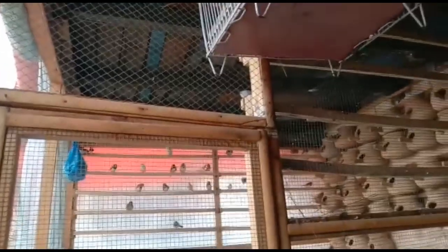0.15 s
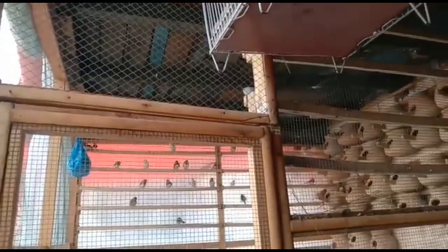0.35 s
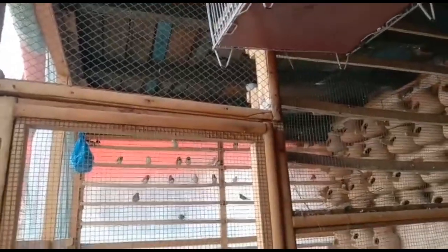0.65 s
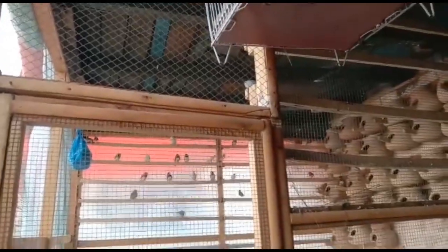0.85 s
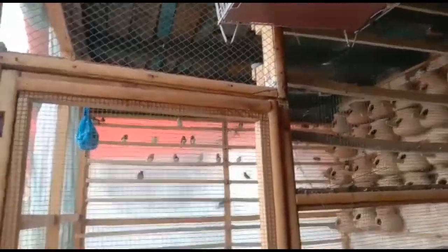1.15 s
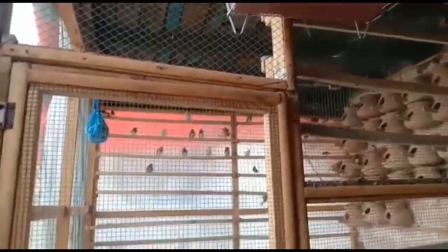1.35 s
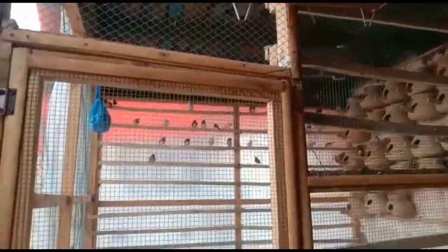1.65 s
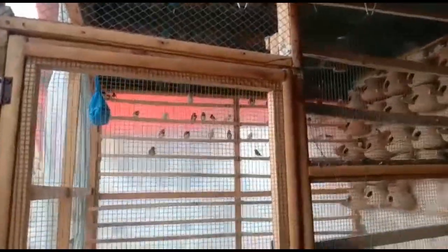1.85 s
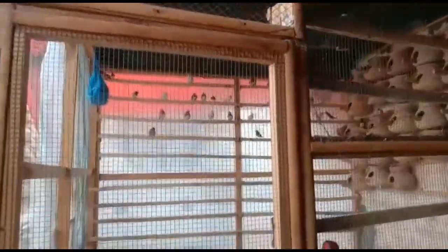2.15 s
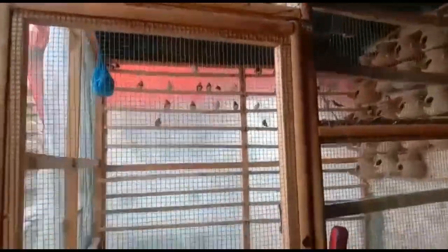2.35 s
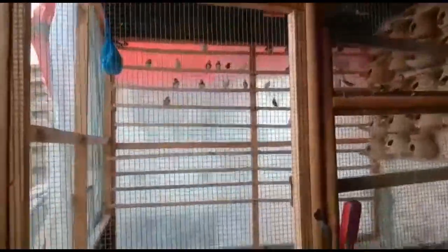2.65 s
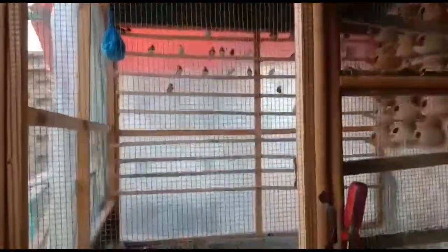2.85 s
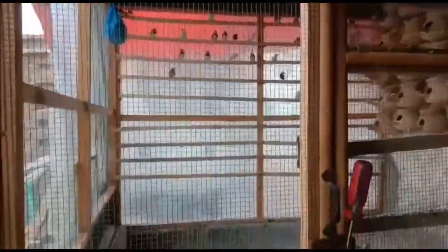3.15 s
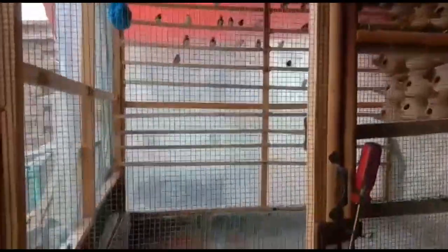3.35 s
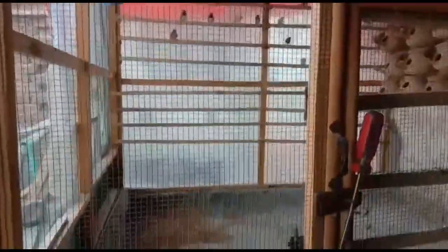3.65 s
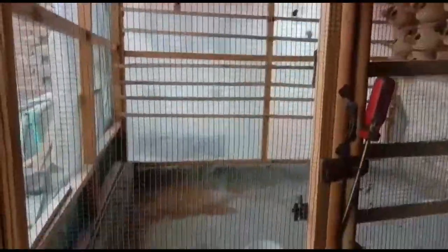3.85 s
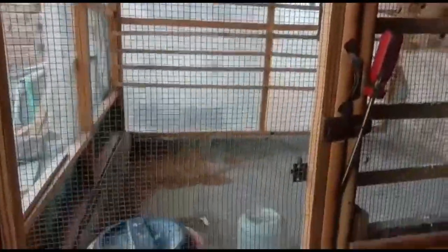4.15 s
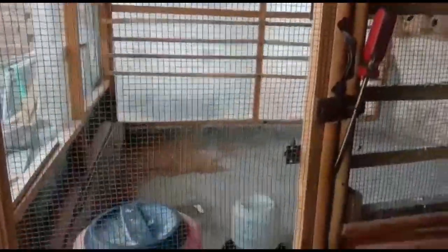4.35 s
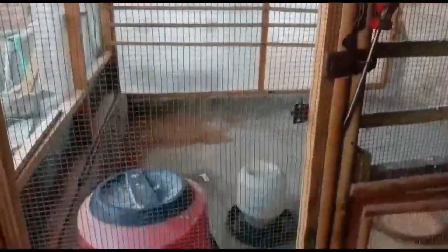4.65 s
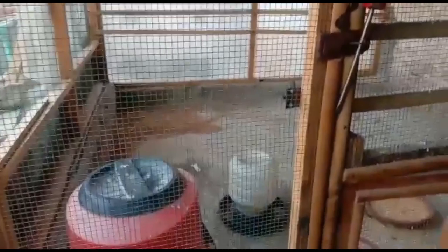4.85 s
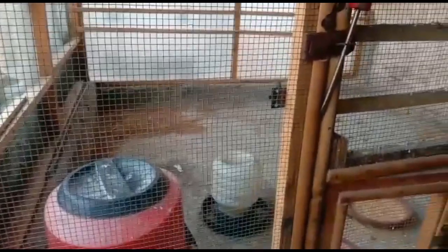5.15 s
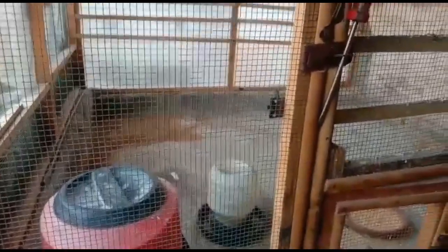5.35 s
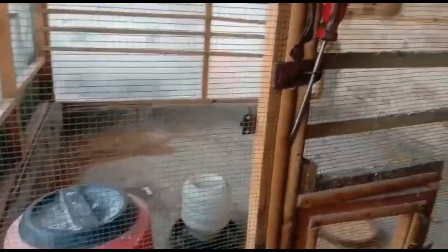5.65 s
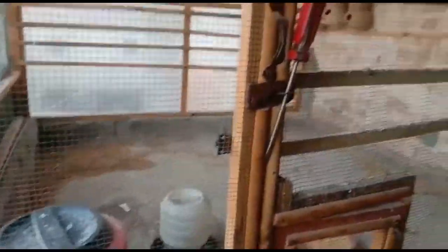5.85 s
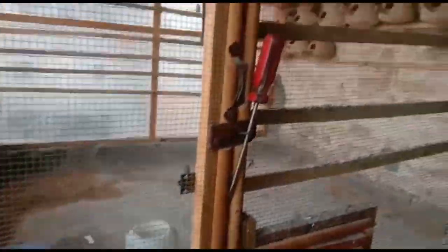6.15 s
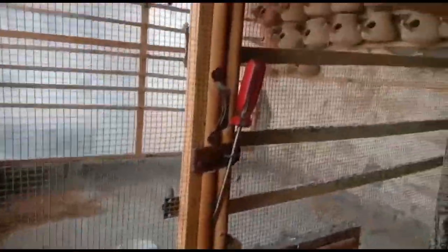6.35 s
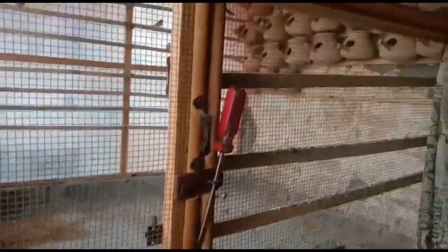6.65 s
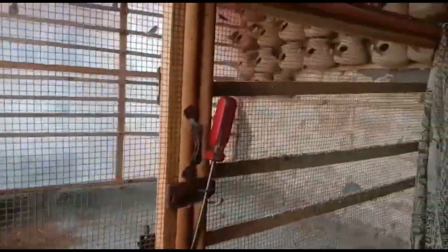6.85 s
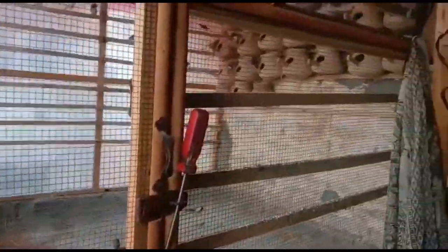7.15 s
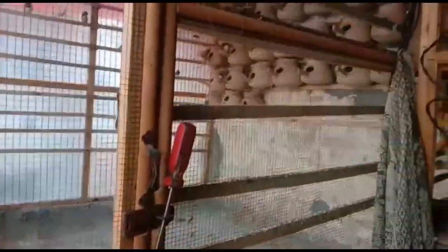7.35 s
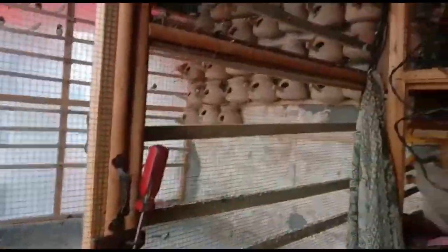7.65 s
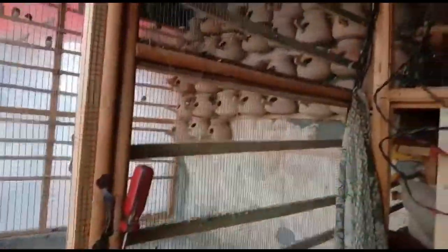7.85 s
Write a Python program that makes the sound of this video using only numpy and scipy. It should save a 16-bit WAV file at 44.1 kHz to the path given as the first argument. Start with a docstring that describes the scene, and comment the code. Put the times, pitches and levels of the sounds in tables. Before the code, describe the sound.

A flock of finches chatters in overlapping nasal calls and chirps, with light flicks on wire mesh and a low rumble beneath.

```python
"""A wood and wire aviary of small finches. Soft nasal calls and harsh rasps come from the back, loud
arched chirps from nearer perches in the second half. Each voice is a harmonic stack plus pulsed breath,
shaped by throat and beak and echoed by the walls. Claws pluck the wire; wings and feet flick mesh and
wood; one bird flies briefly. Beneath lie a low rumble, a faint hiss and a few dull bumps. Almost mono."""
import sys
import numpy as np
from scipy import signal
from scipy.fft import rfft, irfft, next_fast_len
from scipy.io import wavfile
from scipy.ndimage import map_coordinates

SR = 44100
rng = np.random.default_rng(int(sys.argv[2]) if len(sys.argv) > 2 else 0)


def dump(signal):
    """Clip the signal to [-1, 1] and save it as 16-bit WAV at the path in sys.argv[1]."""
    limited = np.clip(np.atleast_2d(signal).T, -1, 1)
    pcm = np.round(limited * 32767).astype(np.int16)
    wavfile.write(sys.argv[1], SR, pcm)


N = 353241
TOP_HZ = 15750
USUAL_LENGTH_S = 0.08  # of a chirp or call


def amp(db):
    """Decibels to gain."""
    return 10 ** (np.asarray(db) / 20)


def unit(x):
    """Scale to rms 1."""
    return x / np.sqrt(np.mean(x ** 2) + 1e-20)


def along(points, hz):
    """(f/Hz, value) points read on a log axis."""
    f, v = np.transpose(points)
    return np.interp(np.log(hz + 1), np.log(f + 1), v)


def curve(rows):
    """(t/s, value) points as one value per sample."""
    return np.interp(np.arange(N) / SR, *np.transpose(rows))


def wobble(rate_hz, size):
    """Random knots joined by straight lines."""
    knots = rng.standard_normal(size // 8 + 8)
    return map_coordinates(knots, [np.arange(size) * rate_hz / SR], order=1, mode="wrap")


def coloured(x, spectrum):
    """Filter by (f/Hz, gain/dB) points."""
    size = x.shape[-1]
    m = next_fast_len(size + 2048)
    gain = amp(along(spectrum, np.fft.rfftfreq(m, 1 / SR)))
    return irfft(rfft(x, m) * gain, m)[..., :size]


def noise(spectrum, size):
    """Coloured noise of rms 1."""
    return unit(coloured(rng.standard_normal(size), spectrum))


def add(track, s, sound):
    """Mix a sound into the track at time s."""
    start = max(round(s * SR), 0)
    part = track[start:start + len(sound)]
    part += sound[:len(part)]


# Background spectra: f/Hz, density/dB
RUMBLE_SPECTRUM = [(25, -32.5), (48, -38), (70, -10.5), (100, 2), (135, 3.5), (190, -11.5), (232, 2.5),
                   (270, -12), (450, -19.5), (700, -37), (1000, -19.5), (2500, -57)]
LOW_AIR_SPECTRUM = [(120, -10), (320, 3.5), (550, -3), (900, -10), (1600, -1.5), (3000, -75.5)]
HISS_SPECTRUM = [(300, -18), (800, -2), (1080, -15), (1260, 21.5), (1480, -13.5), (2000, 1.5), (3000, -16),
                 (5500, -8), (7200, -39), (9000, -23), (13500, -36.5), (15300, -21), (16000, -13)]
RUSTLE_SPECTRUM = [(2000, -29), (5500, 15.5), (7400, 26), (8800, 7.5), (13500, 2.5), (15300, 16.5),
                   (16000, -15)]
# Background envelopes: t/s, level/dB
RUMBLE_ENVELOPE = [(1.0, -55), (2.3, -56), (2.75, -52), (3.2, -54), (4.5, -56.5), (5.8, -54.5),
                   (6.6, -52.5), (7.7, -55.5)]
LOW_AIR_ENVELOPE = [(2.8, -61), (3.6, -58), (3.9, -62), (7, -64.5), (8.01, -53.5)]
RUSTLE_ENVELOPE = [(0.2, -75), (1.0, -74), (1.7, -68), (2.97, -75), (5.42, -81), (8.01, -74)]


def background(hiss_db=-60):
    """Uneven rumble, low air, hollow hiss and a scratchy rustle of feathers and feet."""
    rumble = amp(curve(RUMBLE_ENVELOPE) + 3.2 * wobble(17, N)) * noise(RUMBLE_SPECTRUM, N)
    low_air = amp(curve(LOW_AIR_ENVELOPE) + 3 * wobble(18, N)) * noise(LOW_AIR_SPECTRUM, N)
    hiss = amp(hiss_db + 3 * wobble(19, N)) * noise(HISS_SPECTRUM, N)
    rustle = amp(curve(RUSTLE_ENVELOPE) + 4.5 * wobble(70, N)) * noise(RUSTLE_SPECTRUM, N)
    return rumble + low_air + hiss + rustle


# Wall echo decay: f/Hz, t60/s
WALL_DECAY = [(500, 0.27), (2000, 0.16), (5000, 0.13), (12000, 0.021)]


def from_perch(sound, wet_db):
    """Direct sound plus near-wall echoes, new for each perch; energy is preserved."""
    hz, t, spectrum = signal.stft(rng.standard_normal(SR // 3), SR, nperseg=256)
    t60_s = np.maximum(along(WALL_DECAY, hz), 0.01)[:, None]
    tail = signal.istft(spectrum * amp(-60 * t / t60_s), SR, nperseg=256)[1]
    path = amp(wet_db) * tail / np.linalg.norm(tail)
    path[0] += 1
    heard = signal.fftconvolve(sound, path)
    return heard * np.linalg.norm(sound) / np.linalg.norm(heard)


def syrinx(pitch_hz, rough, colour, beak_hz, beak_db, shut, jitter=0.033, flutter=0.0073):
    """Coloured harmonics with a beak resonance; roughness shakes the pitch and adds pulsed breath."""
    def off_beak(hz, width_oct=0.36):
        return 1 - np.exp(-(np.log2(hz / beak_hz) / width_oct) ** 2)

    size, rough = len(pitch_hz), np.clip(rough, 0, 1)
    shake = jitter * rough * wobble(888, size) + flutter * wobble(162.2, size)
    phase = 2 * np.pi * np.cumsum(pitch_hz * (1 + shake)) / SR
    k = np.arange(1, 25)[:, None]
    cut_db = (beak_db - 1.5 * shut) * off_beak(k * np.median(pitch_hz))  # resonance rides on the pitch
    harmonic_db = along(colour, k * pitch_hz) - cut_db + 2 * rng.standard_normal(k.shape)
    strength = amp(harmonic_db) * (k * pitch_hz < TOP_HZ)
    tone = unit(np.sum(strength * np.sin(k * phase + np.pi * rng.random(k.shape)), axis=0))
    hz = np.geomspace(300, TOP_HZ, 200)
    breath_colour = np.c_[hz, along(colour, hz) - beak_db * off_beak(hz)]
    breath = unit(coloured(rng.standard_normal(size) * (1 + np.cos(phase)), breath_colour))
    breath_share = 0.6 * rough
    return np.sqrt(1 - breath_share) * tone + np.sqrt(breath_share) * breath


def nasal_call(length_s, pitch_hz, glide_oct, rough, colour, beak_hz, bend_oct=0.1238):
    """A low call on a bowed, unsteady pitch; it swells and fades as the beak opens and shuts."""
    u = np.linspace(0, 1, round(length_s * SR))
    octaves = glide_oct * (u - 0.5) - bend_oct * (2 * u - 1) ** 2 + 0.0089 * wobble(59.6, len(u))
    gape = np.abs(np.sin(np.pi * u))
    voice = syrinx(pitch_hz * 2 ** octaves, rough, colour, beak_hz, beak_db=4, shut=1 - gape)
    return gape ** 0.42 * voice


# Nasal voice colour: f/Hz, gain/dB
NASAL_COLOUR = [(500, -19), (950, -14.5), (1250, 0.5), (1550, -10), (2100, 0.5), (3000, -2), (4000, -1),
                (5200, -2), (6500, -11.5), (7200, -16), (8800, -34), (15000, -43)]
# Contact calls: t/s, length/s, mid pitch/Hz, level/dB, beak resonance/Hz
CONTACT_CALLS = [ (0, 0.037, 620, -50, 4040), (0.053, 0.11, 585, -46, 3730),
                 (0.139, 0.089, 608, -45.5, 2430), (0.206, 0.08, 563, -40, 3120),
                 (0.282, 0.085, 517.5, -40.5, 4230), (0.629, .091, 549, -43, 2920),
                 (1.096, 0.082, 512, -56, 3760), (1.371, 0.084, 564, -49, 3620),
                 (1.606, 0.042, 537, -48, 2500), (1.838, 0.12, 506, -45.5, 4900),
                 (3.541, .1, 488, -54, 2300), (3.843, 0.063, 533, -56, 3880),
                 (4.062, 0.11, 569.6, -49.5, 3200), (4.216, 0.14, 643, -42.5, 3900),
                 (4.419, 0.06, 606, -46.5, 4800), (4.565, 0.12, 569, -50.5, 3070),
                 (5.011, 0.057, 564, -39.5, 2090), (5.191, 0.12, 576.6, -44.5, 2600),
                 (5.359, 0.078, 427.8, -41.5, 3440), (5.518, 0.045, 516, -45.5, 3170),
                 (5.748, 0.043, 598, -45.5, 4440), (5.804, .1, 493, -43, 3940),
                 (5.982, 0.07, 549, -40.5, 3850), (6.102, 0.038, 665, -39.5, 5240),
                 (6.179, 0.056, 612, -40.5, 4500), (6.26, 0.05, 583, -41, 3820),
                 (6.411, 0.04, 563, -45.5, 4370), (6.681, 0.068, 543, -43.5, 4250),
                 (6.756, 0.075, 615, -41, 3650), (6.893, 0.088, 565, -43.5, 4130),
                 (7.2, 0.064, 547, -37, 4800), (7.569, 0.079, 593.7, -40.5, 4040),
                 (7.892, 0.093, 545, -45, 3400)]


def contact_calls(usual_sag_oct=0.058, usual_rough=0.17, usual_db=-50.5, rough_doubling_db=9):
    """Back perches: short, forced calls rasp more; long ones run out of breath and sag."""
    track = np.zeros(N)
    for s, length_s, pitch_hz, db, beak_hz in CONTACT_CALLS:
        stretch = length_s / USUAL_LENGTH_S
        rough = usual_rough / stretch * 2 ** ((db - usual_db) / rough_doubling_db)
        glide_oct = -usual_sag_oct * stretch ** 3.7
        call = nasal_call(length_s, pitch_hz, glide_oct, rough, NASAL_COLOUR, beak_hz)
        add(track, s, from_perch(amp(db) * call, wet_db=1))
    return track


def late_echo(birds, t60_s=0.42, gain_db=-14):
    """The chatter lingers faintly under the roof."""
    t = np.arange(SR) / SR
    tail = rng.standard_normal(SR) * amp(-60 * t / t60_s)
    return amp(gain_db) * signal.fftconvolve(birds, tail / np.linalg.norm(tail))[:N]


# Far chatter envelope: t/s, level/dB
FLOCK_ENVELOPE = [(2.0, -66), (2.7, -78), (4.7, -78), (5, -57)]


def far_flock(count=50):
    """The rest of the flock calls at random, blurred by the walls."""
    track = np.zeros(N)
    times_s = (np.arange(count) + rng.random(count)) * N / SR / count
    for s, (long, high, slide, loud) in zip(times_s, rng.standard_normal((count, 4))):
        length_s = 0.071 * np.exp(0.213 * long)
        pitch_hz = 550 * np.exp(0.13 * high)
        db = np.interp(s, *np.transpose(FLOCK_ENVELOPE)) + loud
        call = nasal_call(length_s, pitch_hz, 0.052 * slide, 0.041, NASAL_COLOUR, beak_hz=3560)
        add(track, s, from_perch(amp(db) * call, wet_db=4.5))
    return track


# Claw plucks: t/s, level/dB
CLAW_PLUCKS = [(0.451, -43.5), (0.499, -48), (1.061, -49)]
# Wire modes: f/Hz, gain/dB
PING_MODES = [(6300, -4.5), (7150, -1.5)]


def claws(t60_s=0.11, attack_s=0.00054):
    """Claws pluck the wire: thin pings with a scratch."""
    track, t = np.zeros(N), np.arange(SR // 12) / SR
    for s, db in CLAW_PLUCKS:
        ring = sum(amp(mode_db) * np.sin(2 * np.pi * hz * rng.normal(1, 0.0091) * t)
                   for hz, mode_db in PING_MODES)
        envelope = amp(db - 60 * t / t60_s) * (1 - np.exp(-t / attack_s))
        add(track, s, envelope * (ring + 0.5 * noise(RUSTLE_SPECTRUM, len(t))))
    return from_perch(track, wet_db=-16)[:N]


# Calls from the nest pots: t/s, length/s, pitch/Hz, level/dB
POT_CALLS = [(0.456, .18, 546, -55.5), (1.211, 0.1, 705, -54.5), (3.132, 0.059, 504, -51),
             (3.334, 0.12, 440, -60.5)]
# Voice colour inside a pot: f/Hz, gain/dB
POT_COLOUR = [(450, -24), (700, 1), (1250, -2), (2000, -1.5), (3200, -6.5), (9000, -37)]


def nest_calls():
    """Calls muffled by the nest pots, heard mostly as echo."""
    track = np.zeros(N)
    for s, length_s, pitch_hz, db in POT_CALLS:
        call = nasal_call(length_s, pitch_hz, glide_oct=0, rough=0.021, colour=POT_COLOUR, beak_hz=1640)
        add(track, s, from_perch(amp(db) * call, wet_db=19))
    return track


# Scolding rasps: t/s, length/s, level/dB, beak resonance/Hz
SCOLDS = [(0.552, 0.06, -42, 3670), (0.747, 0.077, -45, 4030), (0.901, 0.068, -44.5, 5400),
          (1.5, 0.061, -45, 2900), (1.97, 0.062, -38.5, 2980), (2.13, 0.046, -33.5, 4600),
          (2.305, 0.056, -38, 3400), (2.431, 0.089, -41, 2900), (6.644, 0.054, -38.5, 5100)]


def rasps(pitch_hz=585.4, rough=0.75, skew=1.35):
    """A scold swells, then breaks off; roughness nearly hides its pitch."""
    track = np.zeros(N)
    for s, length_s, db, beak_hz in SCOLDS:
        u = np.linspace(0, 1, round(length_s * SR))
        gape = np.abs(np.sin(np.pi * u ** skew))
        voice = syrinx(np.full(len(u), pitch_hz), rough, NASAL_COLOUR, beak_hz, beak_db=4.5, shut=1 - gape)
        add(track, s, from_perch(amp(db) * gape * voice, wet_db=-8.5))
    return track


# Bright chirp colour, including the microphone's notch near 6.6 kHz: f/Hz, gain/dB
CHIRP_COLOUR = [(700, -20.5), (1000, -18), (1300, -4), (2000, -4.5), (2500, -6.5), (3000, -2), (4000, 0),
                (5200, 0.5), (6000, -3.5), (6550, -13.5), (7200, -10), (8800, -34), (15000, -45.5)]
# Arched chirps: t/s, length/s, top pitch/Hz, level/dB, roughness/0-1, climb/s, beak resonance/Hz
ARCHED_CHIRPS = [ (0.817, 0.087, 1174, -47, 0.08, 0.0058, 2350),
                 (1.293, 0.071, 1034, -42, 0.08, 0.036, 2920), (2.537, .028, 1360, -55.5, .2, 0.0098, 5500),
                 (4.766, 0.028, 1110, -36.5, 0.05, 0.012, 3670),
                 (4.786, 0.083, 1194, -31.5, 0.56, 0.014, 4400),
                 (4.902, 0.042, 1048, -34, 0.16, 0.022, 4000),
                 (4.943, .062, 1115, -28.5, 0.7, 0.0236, 5200), (5.008, 0.073, 946, -32, 0.1, 0.022, 4120),
                 (5.115, 0.083, 974.4, -29.5, 0.2, .028, 4200),
                 (5.294, 0.069, 1407, -37, 0.78, 0.018, 5600), (5.477, 0.042, 1366, -35, 0.06, 0.017, 5240),
                 (5.603, 0.078, 968, -32, 0, 0.027, 4800), (5.907, 0.067, 1025, -31, 0.09, 0.026, 4030),
                 (6.134, 0.12, 951, -34.5, 0.77, 0.024, 4900), (6.376, 0.035, 1332, -32.5, 0, 0.016, 4700),
                 (6.502, 0.077, 1011, -30.5, 0, .032, 4200), (6.825, 0.083, 985, -32.5, 0.12, 0.025, 4330),
                 (7.043, 0.027, 1198, -45.5, 0.7, 0.023, 4660),
                 (7.115, 0.085, 1088, -37.5, 0.5, 0.0097, 5200),
                 (7.3, 0.055, 1343, -33.5, 0.03, 0.022, 4900), (7.426, 0.087, 983.3, -32, 0.02, 0.03, 4400),
                 (7.678, 0.079, 1008, -31.5, 0, 0.045, 4770),
                 (7.814, 0.078, 1042, -30.5, 0.07, 0.026, 4600)]


def chirps(hold_share=0.4, wander_oct=0.0055, edge_drop_db=10, quaver_db=1.3):
    """Near birds: a soft raspy climb, a cleaner held top, a rough tumble as the beak closes."""
    track, t = np.zeros(N), np.arange(SR // 8) / SR
    for s, length_s, top_hz, db, top_rough, climb_s, beak_hz in ARCHED_CHIRPS:
        u = t / length_s
        scoop = np.clip(1 - t / climb_s, 0, 1)
        fall_s = climb_s + hold_share * (length_s - climb_s)
        tumble = np.clip((t - fall_s) / abs(length_s - fall_s), 0, 1)
        sweep = length_s / USUAL_LENGTH_S * np.exp(0.15 * rng.standard_normal())  # brief chirps: flatter
        drop_oct = sweep * (0.33 * scoop ** 2 + 0.4 * tumble ** 2)
        pitch_hz = top_hz * 2 ** (wander_oct * wobble(76, len(t)) - drop_oct)
        shut = scoop + tumble
        swell = amp(db - edge_drop_db * shut + quaver_db * wobble(139, len(t)))
        gate = np.clip(u * 10, 0, 1) * np.clip((1 - u) * 5 + 1, 0, 1)
        rough = top_rough + 0.6 * scoop ** 2 + 0.9 * tumble
        beak_db = 6.5 * (top_hz / 990) ** 1.43  # high chirps single out one overtone more
        voice = syrinx(pitch_hz, rough, CHIRP_COLOUR, beak_hz, beak_db, shut)
        add(track, s, from_perch(swell * gate * voice, wet_db=-2))
    return track


# Bright tick (with the microphone's 15 kHz resonance) and wooden knock: f/Hz, density/dB
TICK_SPECTRUM = [(3000, -42), (5500, 8), (7300, -3), (8800, -7.5), (13000, -17.5), (15300, -3),
                 (16000, -2.5)]
KNOCK_SPECTRUM = [(100, -8), (700, -6.5), (1280, 6), (1700, 5), (3200, -5.5), (5500, -0.5), (7200, 4),
                  (9000, -34)]
# Wing and foot strikes: t/s, force on wire/dB, force on wood/dB
STRIKES = [(1.597, -45, -49), (1.695, -41.5, -44.5), (1.733, -38, -44), (1.769, -35, -49.5),
           (2.1177, -46, -45.5), (2.2378, -40, -51), (2.275, -46, -50.5), (2.7905, -58, -64),
           (2.915, -56.5, -61.5), (2.9894, -42, -46), (3.533, -56, -51.5), (3.735, -58.5, -58),
           (4.5704, -52, -53), (5.223, -44.5, -45)]


def flicks(wire_gain_db=-2, wood_gain_db=4.5, wire_t60_s=0.098, wood_t60_s=0.13, attack_s=0.0015):
    """Each brush of a wing or foot ticks the wire and knocks the wood."""
    track, t = np.zeros(N), np.arange(SR // 6) / SR
    onset = 1 - np.exp(-t / attack_s)
    for s, wire_db, wood_db in STRIKES:
        tick = amp(wire_db + wire_gain_db - 60 * t / wire_t60_s) * noise(TICK_SPECTRUM, len(t))
        knock = amp(wood_db + wood_gain_db - 60 * t / wood_t60_s) * noise(KNOCK_SPECTRUM, len(t))
        add(track, s, from_perch((tick + knock) * onset, wet_db=-10.5))
    return track


# Dull bumps: t/s, level/dB
LOW_BUMPS = [(2.548, -51.5), (2.718, -43), (4.82, -46.5), (6.47, -48), (6.85, -45.5)]
# Bump spectrum: f/Hz, density/dB
BUMP_SPECTRUM = [(40, -48), (85, 14.5), (135, 19), (190, -5.5), (500, -44)]


def bumps(rise_s=0.03):
    """Soft, brief swells of low noise."""
    track, u = np.zeros(N), np.arange(SR // 4) / SR / rise_s
    swell = (u * np.exp(1 - u)) ** 2
    for s, db in LOW_BUMPS:
        add(track, s, amp(db) * swell * noise(BUMP_SPECTRUM, len(u)))
    return track


# Short flights: t/s, length/s, level/dB
SHORT_FLIGHTS = [(3.487, 0.26, -55)]
# Wing puff spectrum: f/Hz, density/dB
WING_SPECTRUM = [(150, -18), (310, 9.5), (600, -6.5), (7000, -23.5), (9000, -41)]


def flights(beat_hz=23):
    """Each wingbeat pushes a soft puff of air."""
    track = np.zeros(N)
    for s, length_s, db in SHORT_FLIGHTS:
        t = np.arange(round(length_s * SR)) / SR
        beats = 1 + 0.5 * np.sin(2 * np.pi * beat_hz * t)
        swell = np.sin(np.pi * t / length_s) ** 0.5
        add(track, s, amp(db) * beats * swell * noise(WING_SPECTRUM, len(t)))
    return track


def scene():
    """Birds in the centre; only a trace of background differs between the ears."""
    birds = chirps() + contact_calls() + nest_calls() + rasps() + far_flock()
    mid = birds + late_echo(birds) + flicks() + claws() + flights() + bumps() + background()
    side = amp(-89) * noise(RUMBLE_SPECTRUM, N) + amp(-80.5) * noise(HISS_SPECTRUM, N)
    side += amp(-89) * rng.standard_normal(N) + amp(-82) * noise(LOW_AIR_SPECTRUM, N)
    return np.array([mid + side, mid - side])


def record(dry):
    """Brick-wall low-pass at TOP_HZ."""
    m = next_fast_len(N + SR // 4)
    passband = np.fft.rfftfreq(m, 1 / SR) < TOP_HZ
    return irfft(rfft(dry, m) * passband, m)[..., :N]


dry = scene()
out = record(dry)
dump(out)
```